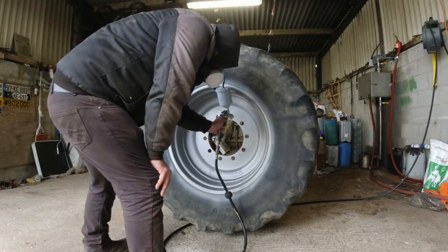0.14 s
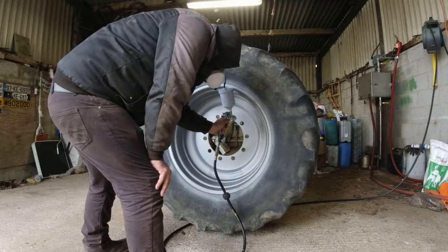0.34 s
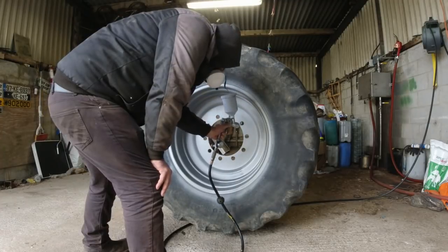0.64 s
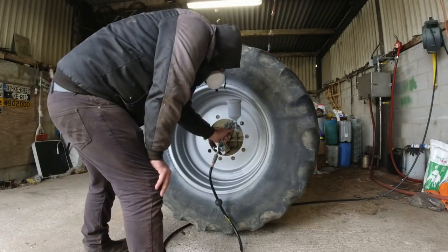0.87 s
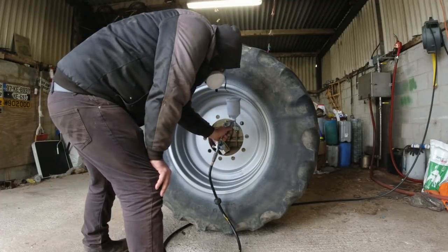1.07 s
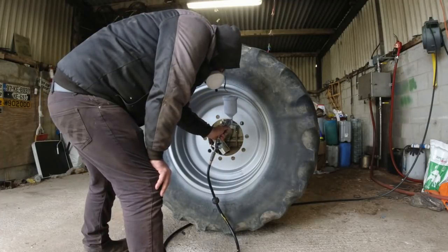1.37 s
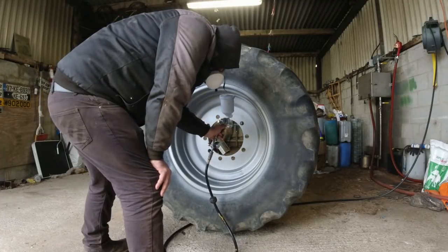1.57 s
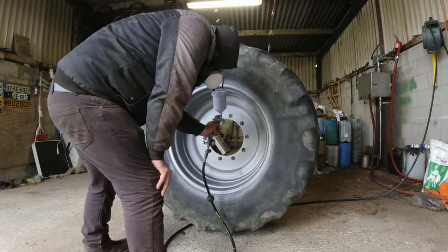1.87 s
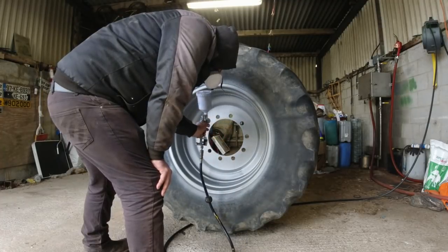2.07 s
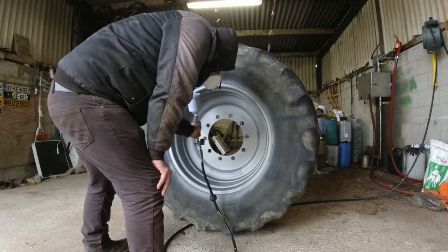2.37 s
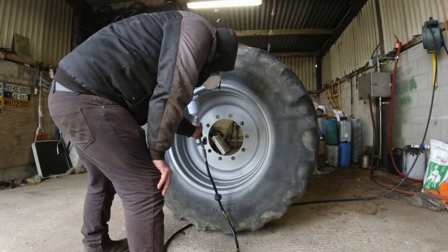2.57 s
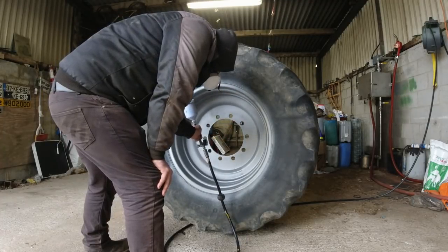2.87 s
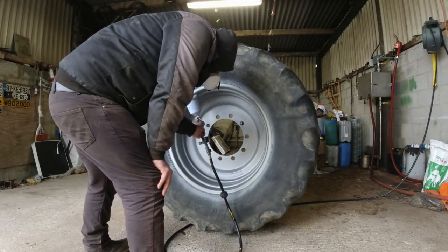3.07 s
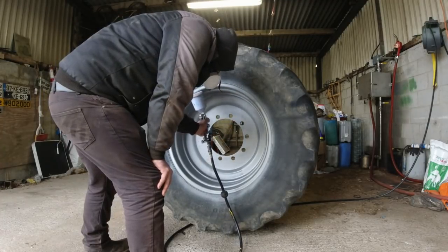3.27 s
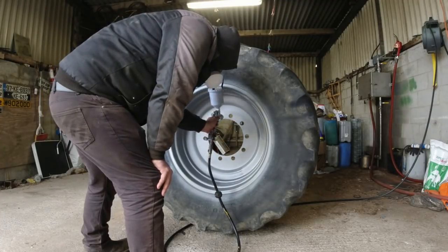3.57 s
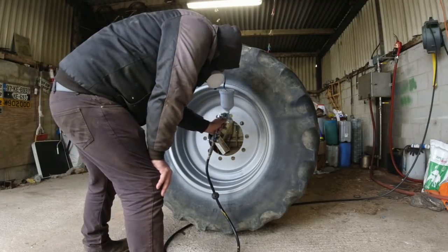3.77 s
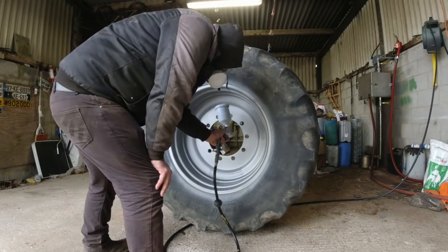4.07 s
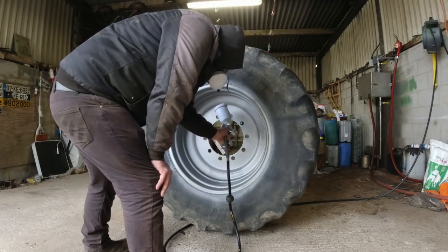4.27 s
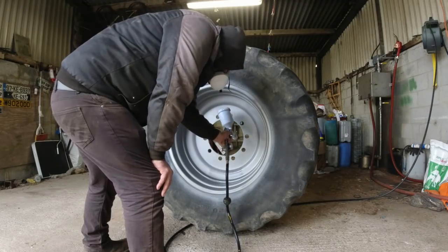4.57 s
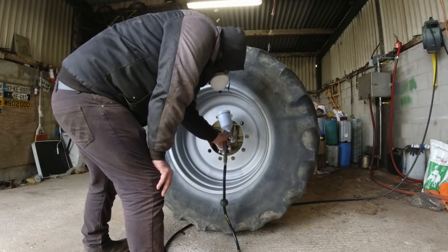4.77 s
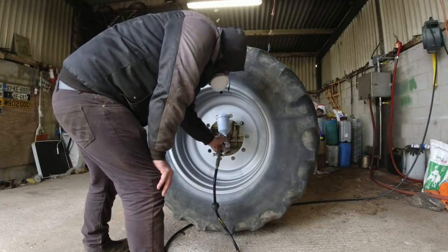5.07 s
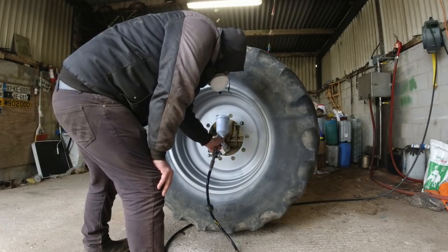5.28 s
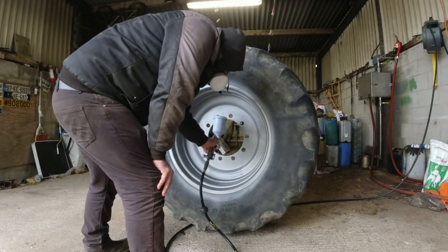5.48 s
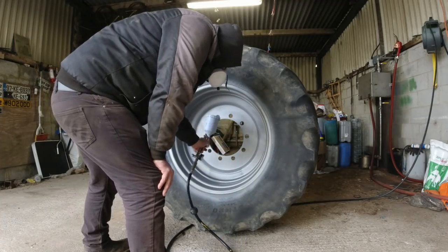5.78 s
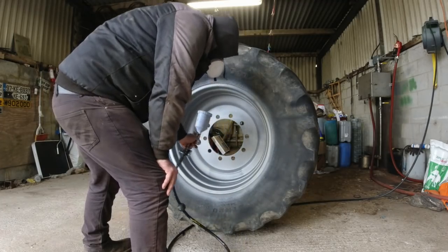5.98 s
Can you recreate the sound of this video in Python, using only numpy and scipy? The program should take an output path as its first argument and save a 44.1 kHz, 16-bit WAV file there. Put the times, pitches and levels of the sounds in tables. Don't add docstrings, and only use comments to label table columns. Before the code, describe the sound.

Close, loud compressed-air paint spraying onto a large steel wheel in a metal-walled shed. The steady bright hiss is already running, stops abruptly, then returns in three longer passes with short pauses. Splashing air and a hollow boom shift as the gun moves; faint breathy whistles drift through. Each release leaves a short room tail over a quiet background, while soft air puffs rumble at the stereo microphone.

```python
import sys
import numpy as np
from scipy import signal
from scipy.fft import rfft, irfft
from scipy.io import wavfile
from scipy.ndimage import uniform_filter1d, map_coordinates

SR = 44100
rng = np.random.default_rng(int(sys.argv[2]) if len(sys.argv) > 2 else 0)


def ratio(d):
    e = np.asarray(d, float) / 20
    return 10 ** e


def wav_out(sig):
    wavfile.write(sys.argv[1], SR, np.round(np.clip(np.atleast_2d(sig).T, -1, 1) * 32767).astype(np.int16))


N = 270465
TIME = np.arange(N) / SR
HZ = np.maximum(np.fft.rfftfreq(N, 1 / SR), 1)
OPEN_S = 0.018

# (valve cracks [s], valve opens [s], valve shuts [s], leak before opening [dB])
TRIGGER_PULLS = [
    (-.1, -0.042, 0.61, -30.),
    (0.754, 0.772, 2.111, -29),
    (2.288, 2.31, 3.982, -32),
    (4.234, 4.246, 6.01, -32),
]
# (opening [dB], closing [dB])
AIR_ONLY_BITE = [(2.5, 3.5), (8, 3.5), (5., 2), (6.5, 4.5)]
# (time [s], boom [dB], splash [dB])
HAND_AIM = [
    [(0.0, -43, -29), (0.58, -44.5, -28), (0.6, -60, -28)],
    [(0.8, -67, -29), (0.86, -45, -29.5), (0.954, -56, -27.5), (0.986, -44.5, -28.5), (1.184, -49, -29),
     (1.248, -42.5, -28), (1.874, -34, -28), (1.974, -40, -29), (2.09, -37.5, -33.5)],
    [(2.335, -31.5, -29.5), (2.517, -41.5, -30.5), (3.045, -40, -30), (3.281, -29, -30),
     (3.327, -32.5, -29.5), (3.841, -32, -27.5), (3.895, -40, -27), (3.931, -27.5, -27), (3.97, -30, -29)],
    [(4.27, -39.5, -27.5), (4.418, -29, -27), (4.674, -37, -29), (4.872, -27.5, -28), (5.112, -32.5, -28.5),
     (5.454, -29.5, -28), (5.56, -35, -30), (5.652, -27, -28), (6.0, -40.5, -26.5)],
]
# (frequency [Hz], level [dB per Hz])
JET_TONE = [(40, -46.5), (75, -7), (105, -5.5), (145, -1.5), (246, -9.5), (290, -23), (400, -8.5),
            (470, -16.5), (610, -7.5), (800, -14.5), (1410, -15), (1830, -9.5), (2600, -14),
            (3300, -11), (4200, -11), (5300, -11.5), (6800, -17.5), (8400, -18), (9300, -17),
                 (10800, -18.5), (12000, -21), (13800, -20.5), (15800, -23.5)]
PART_BORDERS = [
    8500,
    2200,
    450,
]
# (frequency [Hz], likeness [1 = same])
PORT_LIKENESS = [(60, 0.96), (110, 1), (200, 0.98), (380, 0.97), (700, 0.94), (1290, 0.9), (2380, 0.85),
                 (4400, 0.39), (8120, 0.22), (15000, 0.13)]
# (delay [s], swing [s], level [dB])
NEAR_ECHOES = [(.00027, 0.000071, -51), (.00078, 0.00013, -11.5), (.00175, 0.000049, -24.5),
               (.0041, 0.00027, -12.5)]
# (start [s], end [s], pitch [Hz], width [Hz], level [dB])
NOZZLE_TONES = [(0, 0.623, 10000, 1500, -33), (0, 0.547, 12840, 700, -34.5), (0, 0.406, 11950, 500, -34.5),
                (0, .3, 14700, 2000, -32), (0.778, 1.253, 9920, 1600, -32),
                (0.912, 1.372, 12770, 2240, -28.5), (0.987, 1.4, 15350, 705, -34),
                (3.879, 4, 12550, 500, -39), (4.26, 4.603, 9600, 1200, -40.5),
                (5.784, 6.026, 10700, 400, -37.5)]
# (start [s], end [s], from [Hz], to [Hz], level [dB])
EDGE_TONES = [(0.1, 0.44, 3470, 3200, -41.5), (1.22, 1.58, 4300, 6100, -35), (1.52, 2.1, 5000, 5200, -33),
              (1.57, 2.08, 4200, 3670, -36), (2.33, 2.597, 3850, 4300, -34.5),
              (2.65, 2.87, 4140, 4300, -33.5), (2.7, 3.17, 3370, 3570, -37.5),
              (3.246, 3.6, 3860, 3800, -36), (3.502, 4.1, 5700, 5500, -35.5), (3.55, 3.98, 6900, 6300, -39),
              (3.7, 4.3, 4200, 4500, -40.5), (3.602, 3.978, 5200, 4500, -35.5),
              (4.14, 4.75, 4700, 5480, -34), (4.404, 4.994, 3920, 4010, -37.5),
              (4.383, 4.603, 6300, 6600, -34), (4.796, 5.393, 5800, 1960, -45),
              (5.294, 5.608, 4160, 3700, -37.5), (5.7, 6.0, 3400, 4000, -39.5),
              (0.96, 2.0, 6900, 7200, -38.5), (4.26, 4.42, 5200, 9800, -34), (2.85, 3.25, 11000, 8600, -38),
              (4.29, 4.37, 4500, 6400, -31)]
# (frequency [Hz], time to fall by 60 dB [s])
SHED_RING = [(100, 0.56), (400, 0.81), (1500, 0.31), (5000, 0.33), (10000, 0.28), (15000, 0.21)]
# (frequency [Hz], level [dB per Hz])
FLOOR_TONE = [(35, -29), (60, 3), (276, -8.5), (355, -13), (564, -18), (648, -11), (1010, -7), (2060, -23),
              (4410, -20), (9230, -28), (15000, -49)]
# (time [s], level [dB])
AIR_PUFFS = [(.53, -43), (.74, -50.5), (1.019, -43.5), (1.25, -50), (1.52, -46), (1.91, -44), (2.1, -41),
             (2.339, -53), (2.55, -52), (3.0, -54), (3.34, -45), (3.5, -44), (3.98, -52), (4.27, -56),
             (4.85, -51), (5.05, -51), (5.48, -47), (6.1, -54)]


def rms_one(x):
    return x / np.sqrt(np.mean(x ** 2) + 1e-20)


def at_hz(points, hz):
    table = np.array(points)
    return np.interp(np.log(hz), np.log(table[:, 0]), table[:, 1])


def drift(rate_hz):
    r = np.exp(-2 * np.pi * rate_hz * 40 / SR)
    noise = rng.standard_normal(N // 40 + 2002)
    slow = signal.lfilter([1], [1, -2 * r, r * r], noise)[2000:]
    return np.interp(np.arange(N) / 40, np.arange(len(slow)), rms_one(slow))


def two_ports(mid, side, alike):
    return np.sqrt(1 + alike) * mid + np.sqrt(1 - alike) * side * [[1], [-1]]


def stereo_noise(gain, alike):
    mid, side = rfft(rng.standard_normal((2, N)))
    return rms_one(irfft(gain * two_ports(mid, side, np.clip(alike, -1, 1)), N))


def valve():
    shut_db_per_s = 503
    flow = np.zeros(N)
    for crack, opens, shuts, leak_db in TRIGGER_PULLS:
        rise_times = [crack - .01, crack, opens, opens + OPEN_S]
        rise_db = np.interp(TIME, rise_times, [-90, leak_db - 16, leak_db, 0])
        fall_db = shut_db_per_s * np.maximum(TIME - shuts, 0)
        flow += ratio(rise_db - fall_db)
    return flow


def air_only():
    lift_s, seat_s = 0.17, 0.11
    bite_db = np.zeros(N)
    for (_, opens, shuts, _), (opening_db, closing_db) in zip(TRIGGER_PULLS, AIR_ONLY_BITE):
        still_down = np.clip(1 - (TIME - opens - OPEN_S) / lift_s, 0, 1)
        seating = np.clip(1 - (shuts - TIME) / seat_s, 0, 1)
        on = TIME > opens - .05
        bite_db[on] = (opening_db * still_down + closing_db * seating)[on]
    return bite_db


def jet(shared_db, flicker_db, gusty_db):
    times, *aim = np.transpose(np.vstack(HAND_AIM))
    boom_db, splash_db = [np.interp(TIME, times, column) for column in aim]
    near_db, bite_db = splash_db + 28, air_only()
    hard_db = boom_db + 35
    hiss_db = -27 + near_db + bite_db
    rush_db = -35.5 + 0.64 * near_db + 0.059 * hard_db - 0.88 * bite_db
    levels_db = [hiss_db, splash_db - 0.25, rush_db, boom_db - 0.5]

    colour = ratio(at_hz(JET_TONE, HZ))
    alike = at_hz(PORT_LIKENESS, HZ)
    above = [0] + [1 / (1 + (border / HZ) ** 8) for border in PART_BORDERS] + [1]
    together = drift(17.0)
    out = 0
    for k, (level_db, gust_db) in enumerate(zip(levels_db, [0, 0, 0, gusty_db])):
        band = np.sqrt(np.maximum(above[k + 1] - above[k], 0))
        part = stereo_noise(colour * band, alike)
        lumps_db = shared_db * together + flicker_db * drift(41) + gust_db * drift(15.0)
        out = out + part * ratio(level_db + lumps_db)

    roar_hz, roar_width_hz = 345, 207
    roar = stereo_noise(1 / (1 + (2 * (HZ - roar_hz) / roar_width_hz) ** 2), alike)
    roar_db = -45.5 + 1.4 * hard_db
    return out + roar * ratio(roar_db + gusty_db * drift(43))


def moving_echoes(x, hand_rate_hz):
    dull = signal.sosfilt(signal.butter(1, 2500, fs=SR, output="sos"), x)
    out, power = x.copy(), 1
    for delay_s, swing_s, level_db in NEAR_ECHOES:
        late_s = np.maximum(delay_s + swing_s * drift(hand_rate_hz), 0)
        at = np.arange(N) - np.round(SR * late_s).astype(int)
        out += ratio(level_db) * dull[:, np.maximum(at, 0)]
        power += ratio(2 * level_db)
    return out / np.sqrt(power)


def whistles(fade_s, waver_db):
    edge_width = 0.094
    rows = [(a, b, hz, hz, width_hz, db, .7) for a, b, hz, width_hz, db in NOZZLE_TONES]
    rows += [(a, b, hz, to_hz, edge_width * hz, db, .4) for a, b, hz, to_hz, db in EDGE_TONES]
    out = np.zeros((2, N))
    for start, end, from_hz, to_hz, width_hz, level_db, alike in rows:
        near = np.flatnonzero((TIME > start - fade_s) & (TIME < end + fade_s))
        white = rng.standard_normal((2, 2, N // 4))[..., :len(near)]
        narrow = signal.butter(2, width_hz / 2, fs=SR, output="sos")
        mid, side = signal.sosfilt(narrow, white[0] + 1j * white[1])
        pitch_hz = np.interp(TIME[near], [start, end], [from_hz, to_hz])
        turn = np.exp(2j * np.pi * np.cumsum(pitch_hz) / SR)
        tone = rms_one(np.real(turn * two_ports(mid, side, alike)))
        swell = np.clip(np.minimum(TIME - start, end - TIME) / fade_s + .5, 0, 1)
        out[:, near] += tone * (swell * ratio(level_db + waver_db * drift(16.7)))[near]
    return out


def ridges(x):
    width_hz, life_s, ridge_db = 219.9, .1, 2
    from_hz, to_hz = 910, 9100
    hz, s, cells = signal.stft(x, SR, nperseg=1024)
    coarse = rng.standard_normal((200, 200))
    at = np.meshgrid(np.minimum(hz / width_hz, 199), np.minimum(s / life_s, 199), indexing="ij")
    bumps = map_coordinates(coarse, at, order=3)
    depth_db = ridge_db / (1 + (from_hz / (hz + 1)) ** 2) / (1 + (hz / to_hz) ** 2)
    return signal.istft(cells * ratio(depth_db[:, None] * bumps), SR, nperseg=1024)[1][:, :N]


def shed(x):
    size, lead = SR // 2, SR // 4
    t = np.arange(size) / SR
    hz = np.maximum(np.fft.rfftfreq(size, 1 / SR), 1)
    mid, side = rfft(rng.standard_normal((2, size)))
    white = two_ports(mid, side, np.clip(at_hz(PORT_LIKENESS, hz), -1, 1))
    tail = 0
    for k, (_, t60) in enumerate(SHED_RING):
        share = at_hz([(centre, j == k) for j, (centre, _) in enumerate(SHED_RING)], hz)
        tail = tail + irfft(white * share, size) * ratio(-60 * t / t60) / np.sqrt(t60)
    tail *= np.clip(t / 0.00093 - 1, 0, 1)
    tail /= np.sqrt(np.sum(tail ** 2) / 2)
    source = np.concatenate([x[0, lead:0:-1], x[0]])
    return signal.fftconvolve(source[None], tail, axes=1)[:, lead:lead + N]


def quiet_floor():
    hum = stereo_noise(ratio(at_hz(FLOOR_TONE, HZ)), at_hz(PORT_LIKENESS, HZ))
    return hum * ratio(-60 + 1.46 * drift(15.0))


def draught():
    rise_db_per_s, fall_db_per_s, calm_db = 78, 114, -60.5
    s, db = np.transpose(AIR_PUFFS)[:, :, None]
    before, after = np.maximum(s - TIME, 0), np.maximum(TIME - s, 0)
    puffs_db = db - rise_db_per_s * before - fall_db_per_s * after
    calm = ratio(calm_db) * uniform_filter1d(valve(), size=2000)
    level = ratio(puffs_db.max(axis=0)) + calm
    low_cut = (HZ / 30) ** 2 / (1 + (HZ / 30) ** 2)
    rumble = low_cut / (1 + (HZ / 65) ** 4)
    return level * stereo_noise(rumble, 0.44)


def scene():
    air = jet(shared_db=0.68, flicker_db=0.93, gusty_db=0.8)
    at_wheel = moving_echoes(air, hand_rate_hz=0.67) + whistles(fade_s=.16, waver_db=3.5)
    gun = valve() * ridges(at_wheel)
    return gun + ratio(-10.5) * shed(gun) + quiet_floor() + draught()


def band_limit(x):
    return signal.sosfilt(signal.butter(12, 17040, fs=SR, output="sos"), x)


def record(dry):
    steep = signal.ellip(12, .3, 80, 15850, fs=SR, output="sos")
    mix = signal.sosfilt(steep, dry)
    return band_limit(mix)


dry = scene()
out = record(dry)
wav_out(out)
```